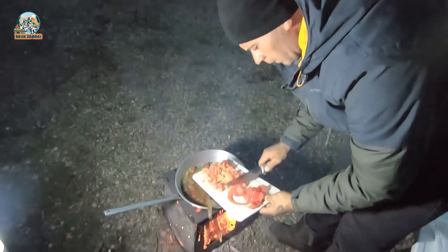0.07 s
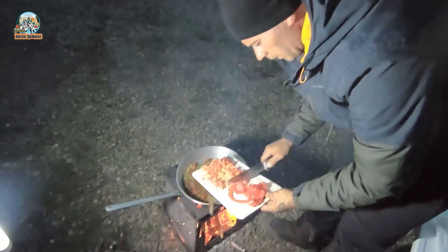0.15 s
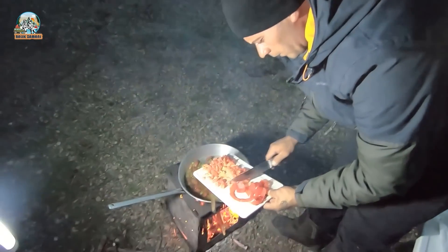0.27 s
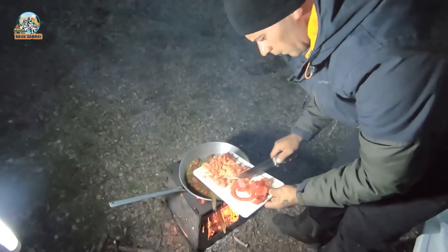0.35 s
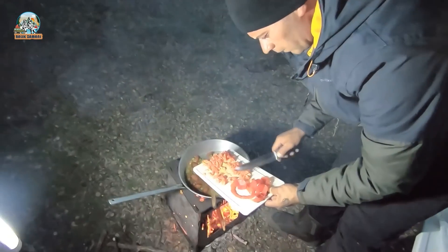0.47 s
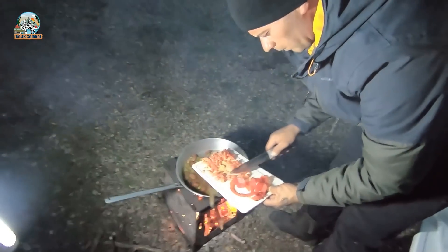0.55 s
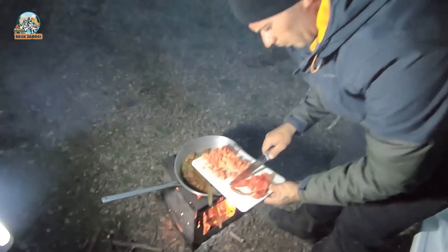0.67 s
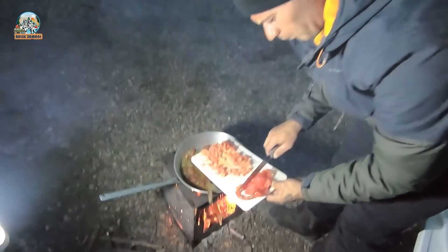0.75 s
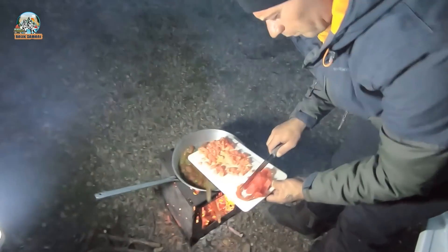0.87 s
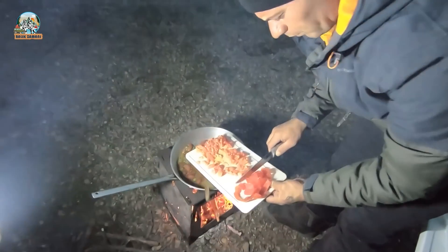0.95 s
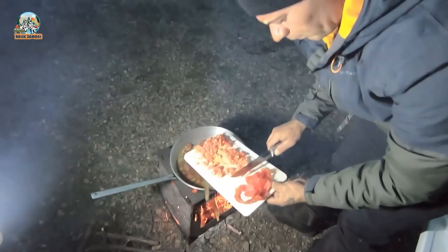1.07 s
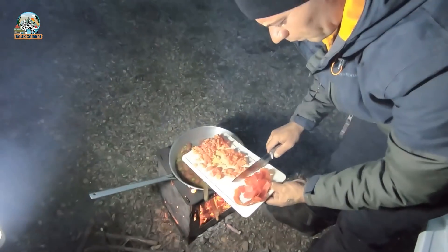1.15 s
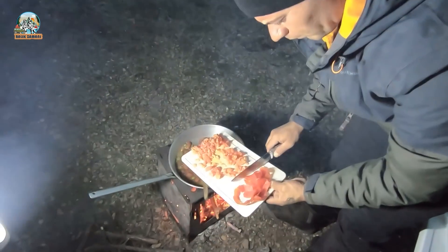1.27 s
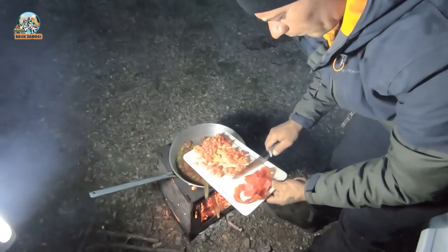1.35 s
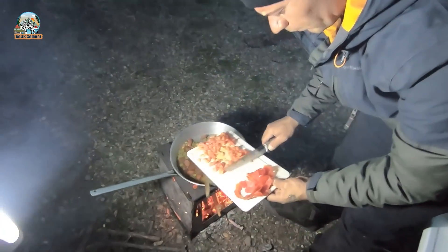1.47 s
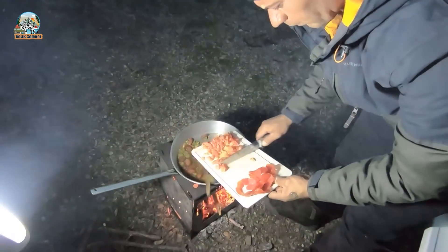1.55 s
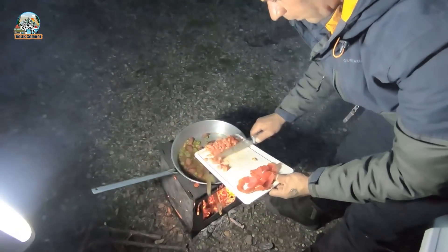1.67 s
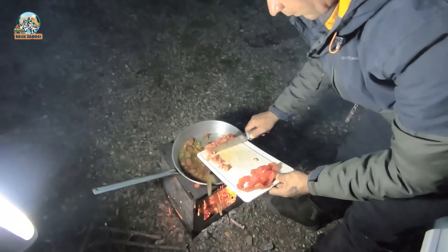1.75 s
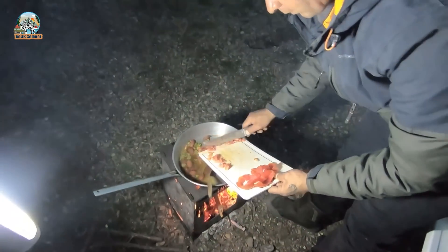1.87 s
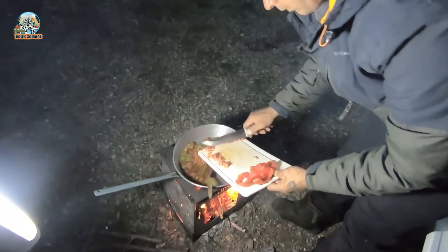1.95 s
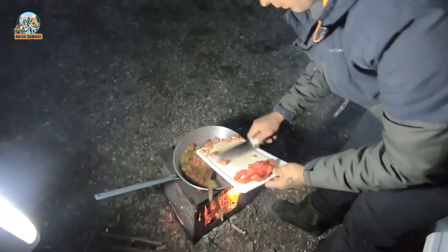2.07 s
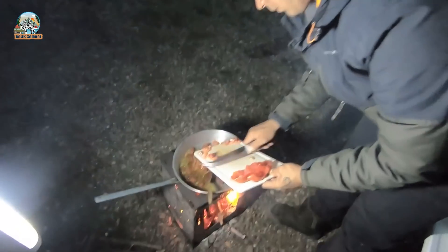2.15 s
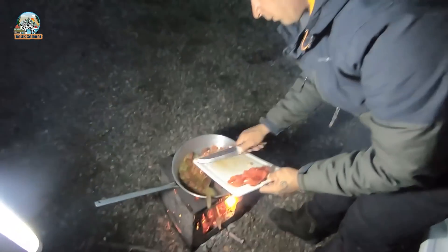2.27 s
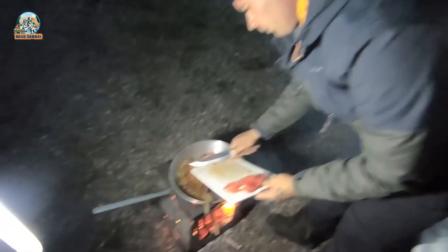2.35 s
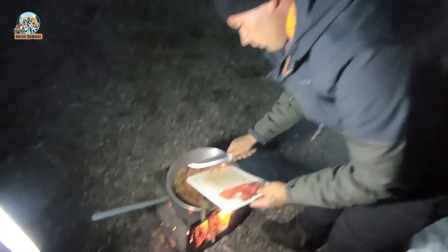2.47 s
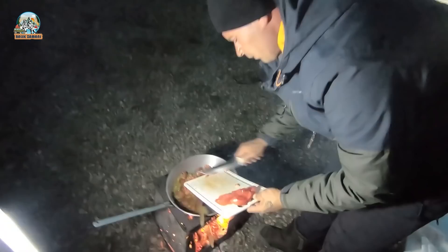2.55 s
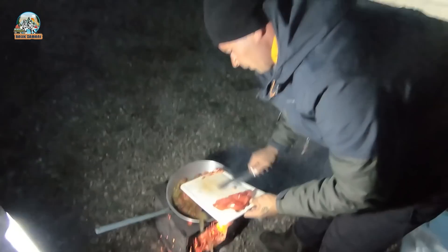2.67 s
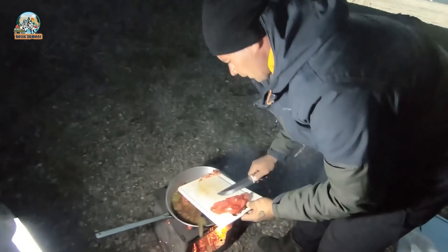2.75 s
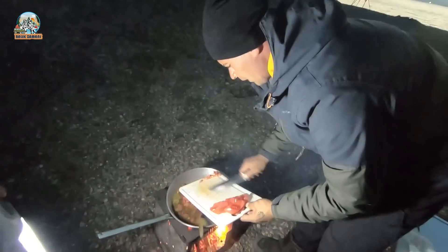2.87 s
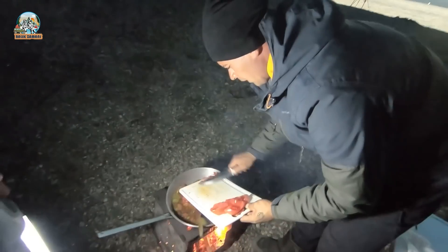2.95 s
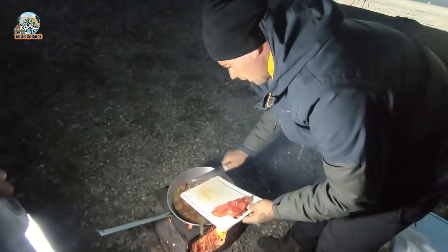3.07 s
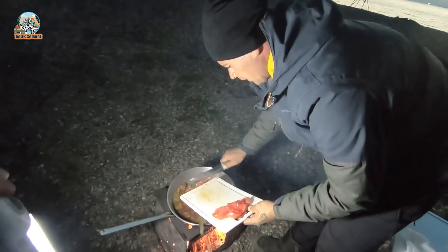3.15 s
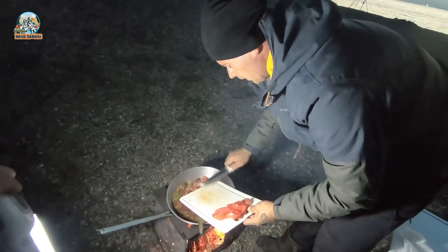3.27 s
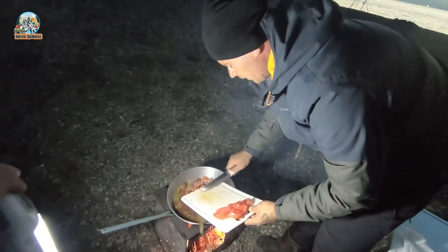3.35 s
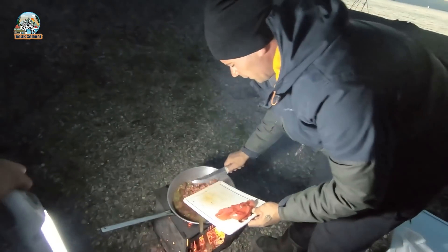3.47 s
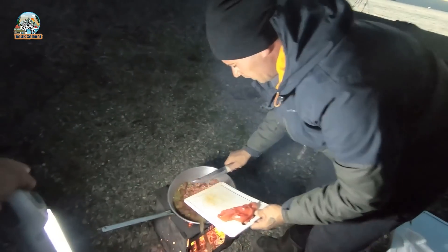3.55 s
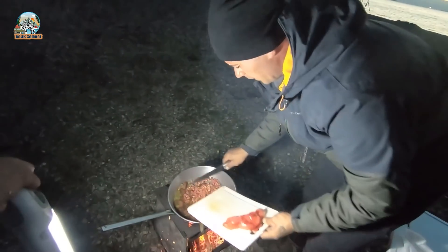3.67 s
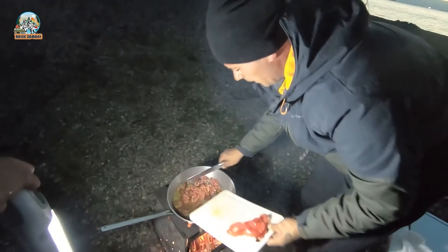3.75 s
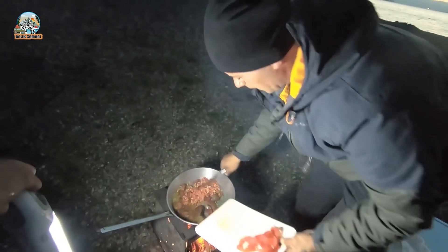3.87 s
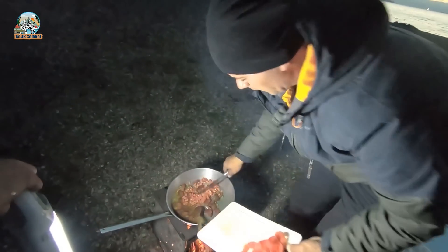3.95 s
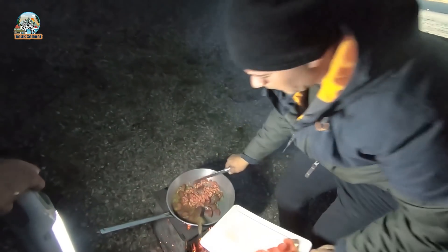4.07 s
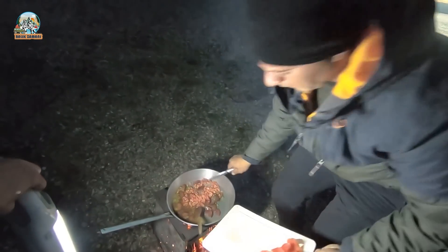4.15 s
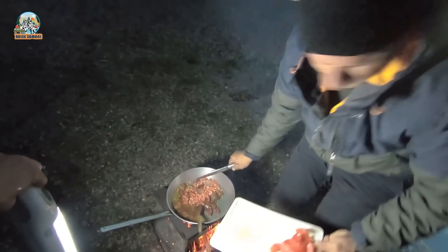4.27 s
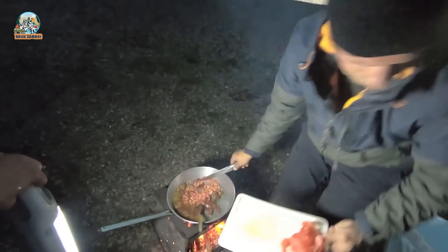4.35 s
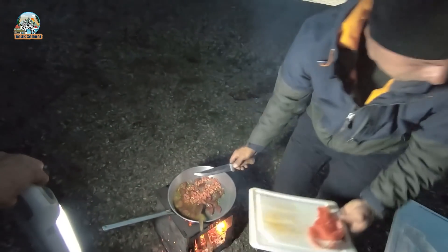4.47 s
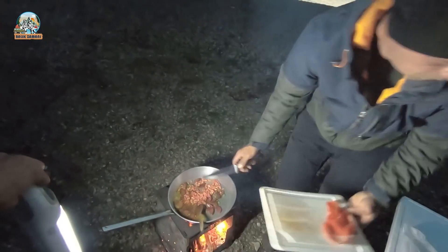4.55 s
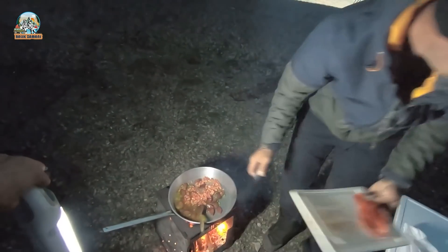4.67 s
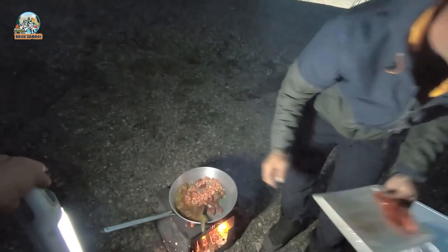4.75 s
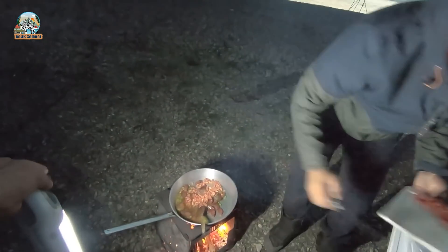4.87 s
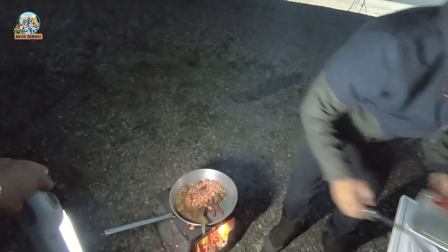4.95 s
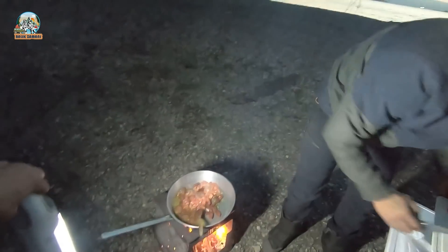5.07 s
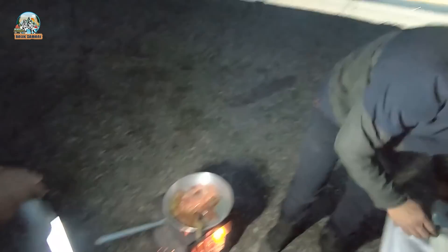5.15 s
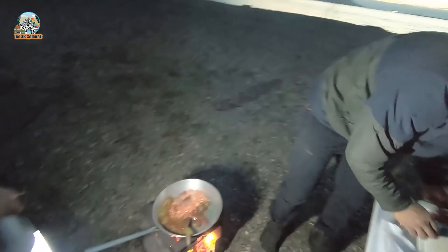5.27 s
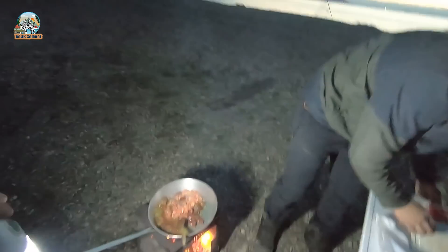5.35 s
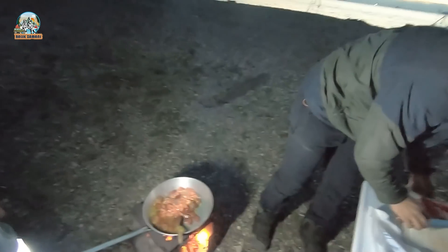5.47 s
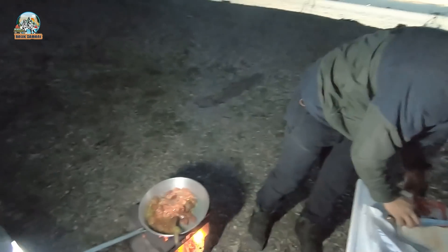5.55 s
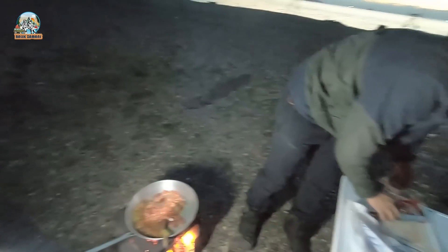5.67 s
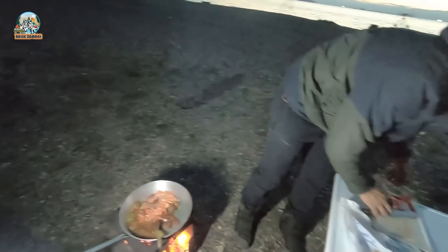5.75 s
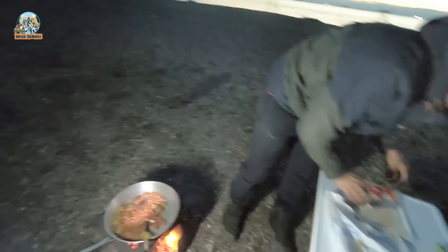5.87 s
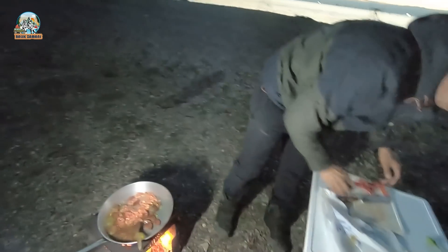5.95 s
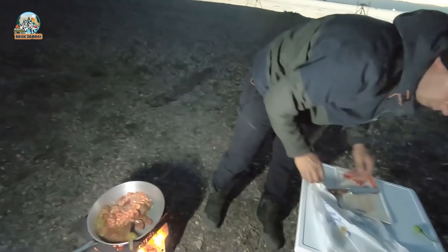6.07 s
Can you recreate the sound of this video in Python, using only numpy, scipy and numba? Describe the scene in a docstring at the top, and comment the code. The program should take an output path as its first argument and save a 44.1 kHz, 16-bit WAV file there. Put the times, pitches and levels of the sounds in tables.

```python
"""Outdoors beside a camp stove, a hand-held two-port microphone a metre and a half from the pan.
Meat fries: oil pops, bubble tones and hiss swell and brighten, with short snaps, plinks and bright ticks.
A knife scrapes chopped meat off a plastic board by stick and slip, ringing both, and taps it clean.
The cook steps aside in short thuds and puts the board on a plastic box to the right in ringing clatter.
Behind, filtered noise makes the fluttering fire and the air brushing the microphone."""
import sys
import numpy as np
from scipy import signal
from scipy.fft import rfft, irfft
from scipy.io import wavfile
from numba import njit

SR = 44100
rng = np.random.default_rng(int(sys.argv[2]) if len(sys.argv) > 2 else 0)


def transcribe(u):
    """Save the signal u as a 16-bit wav file named by the first command-line argument.

    u: samples, shape (n,) or (channels, n), limited to [-1, 1]; the rate is SR.
    q: integer samples, one column per channel.
    """
    v = np.clip(np.atleast_2d(u).T, -1, 1)
    q = np.round(v * 32767).astype(np.int16)
    wavfile.write(sys.argv[1], SR, q)


N = 269451
T = np.arange(N) / SR
HZ = np.maximum(np.arange(4097) * SR / 8192, 1)  # frequency grid for spectra

# bursting oil bubbles: (frequency [Hz], level [dB])
OIL_SPECTRUM = [(180, -51), (300, -11.5), (510, -12), (610, -6), (794, -7), (1330, -5), (2170, -7.5),
                (4280, -0.5), (5390, -5), (7370, -2), (8280, -15), (9600, -8.5), (12500, -19), (15500, -36)]
# bands the open pan favours or shades: (centre [Hz], width [Hz], level [dB])
PAN_BANDS = [(3520, 2800, 2), (7080, 1100, -2), (7600, 730, -1), (10210, 280, 4.5), (11020, 2200, -6)]
# moist meat changes the sizzle: (time [s], level [dB], extra fizz [dB], settling time constant [s])
FLARES = [(0.38, -1.2, 3.5, 1.5), (1.3, 3, -1, 0.41), (1.93, 3, 4.5, 3.66), (2.07, 0.25, 7.5, 0.45),
          (3.13, -1.1, 7, 0.2), (3.6, 0.1, 8.5, 0.31), (4.18, 0, 5.5, 0.076), (4.72, 1.4, 3.5, 0.42),
          (5.331, 1, 2.5, 0.45)]
# short snaps: spits of fat, and at 5.719 s a rattle of the board on the box:
# (time [s], level [dB], pitch [Hz])
SNAPS = [(0.7518, -7.5, 4750), (1.0944, -9.5, 5900), (1.4185, -10.5, 3590), (1.6495, -12.5, 6500),
         (4.461, -12.5, 3240), (5.719, -7, 4030)]
# knife strokes over the board: (start [s], end [s], rasp [dB], swell over the stroke [dB], muffling [dB],
# hollow board [dB], blade ring [dB], blade band [Hz], groan [dB], groan [Hz])
STROKES = [(1.451, 1.696, -45.5, 1.5, -1, -41.5, -42, 2200, -45, 870),
           (1.698, 1.801, -35.5, -4.5, -12, -40, -38.5, 3600, -41, 852),
           (1.82, 1.891, -34, 5, -16, -43.5, -53, 3600, -43.5, 753),
           (2.27, 2.488, -42, -5, 0, -47.5, -39, 2520, -48.5, 970),
           (2.885, 3.115, -35, 3, 2, -49, -36, 3370, -47, 1080)]
# edge rasping on plastic: (frequency [Hz], level [dB])
RASP_SPECTRUM = [(60, -47), (200, 9), (600, -13), (1000, 13.5), (1450, 7.5), (2400, 14), (3000, 11.5),
                 (3750, 13), (4600, -10), (7000, -8), (15000, -33)]
# brief singing of the blade, during scrapes and after one tap, at its mode nearest the pitch:
# (time [s], length [s], level [dB], pitch [Hz])
SQUEALS = [(1.455, 0.073, -41, 2235), (1.835, 0.093, -40, 3538), (2.273, 0.048, -43, 6200),
           (2.361, 0.031, -32.5, 6280), (3.44, 0.041, -39.5, 6100)]
# knife taps on the board: (time [s], level [dB], chatter t60 [s], blade ring [dB], board ring [dB],
# hardness [Hz], clink [dB], clink [Hz], clink t60 [s])
TAPS = [(1.8932, -5.5, 0.009, -9, -24, 3300, -16, 773, 0.084),
        (2.253, -9, 0.015, 8.5, 0, 4920, -3.5, 3538, 0.073),
        (2.837, -4, 0.023, -6.5, -0.5, 1490, -9.5, 1480, 0.031),
        (3.4322, -4, 0.034, 3, 1.5, 4100, -3, 1270, 0.046),
        (3.4782, -5.5, 0.051, -8, 0, 5050, 1, 2900, 0.06)]
# one hard contact: (frequency [Hz], level [dB])
KNOCK_SPECTRUM = [(50, -36), (120, -13), (250, -3), (600, -7), (1300, 5.5), (2000, 2.5), (3200, 5.5),
                  (5000, 2.5), (8000, -3.5), (15000, -5)]
# steel blade modes: (pitch [Hz])
BLADE_HZ = [1035, 2165, 2235, 2550, 2905, 3538, 3915, 4830, 6130, 7456]
# how each blade mode rings: (level [dB], t60 [s])
BLADE_RING = [(7, 0.33), (18.3, 0.19), (21.9, 0.057), (22, 0.063), (7.56, 0.31), (8.3333, 0.29),
              (2.7778, 0.11), (10, 0.16), (6, 0.19), (5, 0.3)]
BLADE_MODES = np.column_stack([BLADE_HZ, BLADE_RING])
# how strongly scraping drives each blade mode: (level [dB])
BLADE_RUB_DB = [-12, -1, -7, -7, -1, 6, -2, 0, -5, -0.5]
# plastic board modes: (pitch [Hz], level [dB], t60 [s])
BOARD_MODES = [(184, 1.5, 0.095), (251, 8.5, 0.035), (270.7, 2, 0.11), (467, 7, 0.027), (616, 3.5, 0.049),
               (698, 3, 0.048), (910, 8, 0.031), (990, 10.5, 0.013)]
# hard plastic and steel set down to the right: (time [s], level [dB], clatter t60 [s], hardness [Hz],
# board ring [dB], left minus right [dB], thud [dB], thud [Hz], clink [dB], clink [Hz], clink t60 [s])
CLACKS = [(4.5643, -2.5, 0.033, 2350, -9, -22.5, -10, 220, -5.5, 7250, 0.0067),
          (5.6784, -1.5, 0.068, 4350, -3.5, -16.5, -14, 175, -4, 2220, 0.047),
          (5.686, 0, 0.22, 1780, -17, -10, -6, 214, -4.5, 1473, 0.046),
          (5.7331, -8, 0.025, 1600, 4, -14, -2.5, 272.6, -12, 641, 0.26),
          (5.7469, -5.5, 0.041, 4600, -29, -14, -9, 535, -14, 1830, 0.13)]
# clatter of the box lid: (frequency [Hz], level [dB])
LID_SPECTRUM = [(50, -36), (130, -44), (300, -16), (800, 0.5), (1450, 2), (2400, 1.5), (4200, 2),
                (5600, -3), (7500, 2.5), (10000, -4), (12000, -32), (15000, -36)]
# plastic box modes: (pitch [Hz], level [dB], t60 [s])
BOX_MODES = [(915, -4, 0.029), (1180, 7, 0.04), (1460, 6, 0.035), (1880, 14, 0.043), (2640, 20.5, 0.02)]
# soft low thuds of meat, board, box and footfalls: (time [s], level [dB], t60 [s], body pitch [Hz])
SOFT_THUDS = [(0.238, -37, 0.099, 260), (1.271, -41.5, 0.05, 476), (2.001, -47.5, 0.39, 343),
              (3.829, -33.5, 0.013, 514), (4.356, -27.5, 0.021, 1260), (5.075, -35, 0.046, 387),
              (5.62, -42, 0.27, 130), (5.776, -28.5, 0.099, 238)]
# boots on packed ground: (time [s], heel [dB], heel [Hz], sole [dB], sole [Hz])
STEPS = [(4.658, -39, 390, -55, 403), (4.825, -37, 345, -37.5, 283), (4.954, -32.5, 1390, -44, 215),
         (5.54, -45, 291, -41, 138)]
# flutter of the fire: (frequency [Hz], level [dB])
FIRE_SPECTRUM = [(40, -23), (65, -4), (90, -39), (120, -13), (160, 4.5), (290, -1), (450, -9.5),
                 (900, -13.5), (3000, -67)]
# puffs of air on the microphone: (time [s], length [s], level [dB], left minus right [dB])
GUSTS = [(4.259, 0.02, -51, -4), (5.252, 0.14, -52, -1.5), (5.528, 0.25, -49, 1),
         (5.897, 0.25, -57.5, -13.5)]
# rumble of air on the microphone: (frequency [Hz], level [dB])
BUFFET_SPECTRUM = [(20, -16), (60, 9.5), (130, 5.5), (250, 2), (600, -15), (2000, -59)]
# share of the sound that differs between the two microphone ports: (frequency [Hz], level [dB])
PORT_DIFFERENCE = [(100, -35), (380, -13), (800, -12), (1300, -8.5), (2400, -9.5), (3800, -23), (5500, -6),
                   (7000, -6), (8700, 3.5), (11000, -11.5), (15000, 1)]

FRY_DB, FIZZ_DB = -41, -8  # the settled sizzle, and the gain of its fine fizz
FLARE_RISE_S = 0.26
# until the board is drawn back from over the pan, the fizz is stronger
BOARD_AWAY_S, BOARD_MOVE_S, COVERED_FIZZ_DB = 2.04, 0.29, 3.5
ROLL_S = 0.034  # from heel to sole
CALM_DB, GUST_RISE_S, GUST_FALL_S = -77, 0.016, 0.045  # air between puffs; how a puff comes and goes
TOP_HZ = 15700  # upper limit of the recorder


def sizzle(pops_per_s=3600, spread_db=1.5, steam_db=-6, bubble_db=-5, flutter_db=1.4,
           flicker_db=-0.5, gap_hz=4000, gap_q=9, gap_db=-7, simmer_db=0, simmer_share=0.29,
           simmer_hz=2000, fizz_hz=6500):
    """Water bursts out of oil in pops and bubble tones; moist meat shifts level, simmer and fizz."""
    flare_db, fizz_db = sum(
        np.outer([db, extra_db], swell(s, FLARE_RISE_S, FLARE_RISE_S, settle_s))
        for s, db, extra_db, settle_s in FLARES)
    covered = np.clip((BOARD_AWAY_S - T) / BOARD_MOVE_S + .5, 0, 1)
    pan_bands_db = sum(db / (1 + (2 * (HZ - hz) / width) ** 2) for hz, width, db in PAN_BANDS)
    tone_db = shape(OIL_SPECTRUM) + pan_bands_db
    rate = pops_per_s * undb(flare_db)
    mid = unit(crackle(rate, spread_db, steam_db) + undb(bubble_db) * bubbles())
    side = colour(crackle(rate, spread_db, steam_db), shape(PORT_DIFFERENCE))
    sound = colour(mid + side * np.array([[1], [-1]]), tone_db)
    # the band around 5 kHz sets the reference level
    sound /= np.std(band(sound.mean(0), [3600, 7500], "bandpass"))
    simmer, rest = split(sound, simmer_hz)
    body, fizz = split(rest, fizz_hz)
    # the gap between board and pan resonates
    body = body + covered * undb(gap_db) * resonance(body, gap_hz, gap_q)
    # each band flickers on its own, half as deeply while the board covers the pan
    unrest = 1 - covered / 2
    wet_db = FIZZ_DB + fizz_db + COVERED_FIZZ_DB * covered
    simmer_gain_db = simmer_db + simmer_share * wet_db + unrest * flicker_db * walk(35)
    simmer = simmer * undb(simmer_gain_db) * pan(-2.0)
    body = body * undb(unrest * flicker_db * walk(30) / 2) * pan(-0.61)
    fizz = fizz * undb(wet_db + unrest * flicker_db * walk(24.9)) * pan(-2.1)
    level_db = FRY_DB + flare_db + unrest * flutter_db * walk(21.92)
    return (simmer + body + fizz) * undb(level_db)


def plinks(level_db=-53):
    """Many bubbles ring longer than the rest, as tiny notes in the sizzle."""
    return undb(level_db) * bubbles(low_hz=2308, high_hz=6960, cycles=24, count=220)


def spatter(per_s=70, spread_db=2.3, level_db=-65, low_hz=5000, top_hz=8000):
    """Tiny droplets burst as faint, bright ticks to the left."""
    ticks = clicks(per_s, spread_db)
    ticks = band(band(ticks, low_hz, "highpass"), top_hz, "lowpass")
    return ports(unit(ticks) * undb(level_db), pan_db=12, width_db=2)


def snaps(t60=0.016, q=5.6, top_hz=7000):
    """Spits of fat and one rattle of the board: short noise bursts, each through one resonance."""
    out = np.zeros(N)
    for s, db, hz in SNAPS:
        snap = band(resonance(chatter(t60), hz, q), top_hz, "lowpass")
        add(out, s, undb(db) * snap / np.linalg.norm(snap))
    return ports(out, pan_db=2.5, width_db=-3)


def scrapes(slips_per_s=1500, spread_db=1.5, grip_db=1.4, edge_s=0.036, bite_q=4, blade_bite_db=7,
            mode_width_hz=36, shift_db=2, groan_q=9, muffle_hz=1550, muffle_width_hz=900,
            groan_waver=0.055, lift_share=0.37):
    """The edge sticks and slips across the board, rasping and ringing both board and blade."""
    slips = clicks(slips_per_s, spread_db) * undb(grip_db * walk(130))
    hollow = unit(ring(slips, BOARD_MODES))
    # pressing broadens the blade modes; each comes and goes as the contact travels along the edge
    blade = sum(undb(db + shift_db * walk(35)) * unit(resonance(slips, hz, hz / mode_width_hz))
                for hz, db in zip(BLADE_HZ, BLADE_RUB_DB))
    # meat lying on the board alters its middle range
    muffle = 1 / (1 + (2 * (HZ - muffle_hz) / muffle_width_hz) ** 2)
    out = np.zeros(N)
    for (start, end, db, swell_db, muffle_db, hollow_db,
         blade_db, blade_hz, groan_db, groan_hz) in STROKES:
        progress = np.clip((T - start) / (end - start), 0, 1)
        # the edge bites quickly and lifts off over a share of the stroke
        contact = np.minimum((T - start) / edge_s, (end - T) / (lift_share * (end - start)))
        pressure = np.clip(contact + .5, 0, 1) * undb(swell_db * (progress - .5))
        rasp = unit(colour(slips, shape(RASP_SPECTRUM) + muffle_db * muffle))
        # the angle of the edge favours one band of the blade in each stroke
        steel = unit(blade + undb(blade_bite_db) * resonance(blade, blade_hz, bite_q))
        # the plastic groans, at a pitch that wanders with the spot being pressed
        groan = unit(resonance(slips, groan_hz, groan_q))
        groan = np.interp(T + groan_waver * np.cumsum(walk(20)) / SR, T, groan)
        stroke = undb(db) * rasp + undb(hollow_db) * hollow
        stroke = stroke + undb(blade_db) * steel + undb(groan_db) * groan
        out += pressure * stroke
    return ports(out, pan_db=-2.0, width_db=-4.5)


def squeals():
    """During scrapes and after one tap, a single mode of the blade sings briefly."""
    out = np.zeros(N)
    for s, length_s, db, hz in SQUEALS:
        mode_hz = min(BLADE_HZ, key=lambda mode: abs(mode - hz))
        add(out, s, sing(length_s, db, mode_hz, waver=0.005, rough_db=3.5))
    return ports(out, pan_db=2.0, width_db=-8)


def taps(chatter_db=22, level_db=5):
    """The knife knocks on the board: a sharp contact and brief chatter; blade and board ring."""
    contact, blade, board, clinks = np.zeros((4, N))
    for s, db, t60, blade_db, board_db, hard_hz, clink_db, clink_hz, clink_t60 in TAPS:
        # a longer chatter carries more of the blow
        blow = undb(chatter_db) * np.sqrt(t60) * chatter(t60)
        blow[0] += 1
        add(contact, s, undb(db) * band(blow, hard_hz, "lowpass"))
        add(blade, s, undb([db + blade_db]))
        add(clinks, s, clink(clink_db, clink_hz, clink_t60))
        add(board, s, undb([db + board_db]))
    knock = undb(level_db) * colour(contact, shape(KNOCK_SPECTRUM))
    sound = knock + ring(blade, BLADE_MODES) + ring(board, BOARD_MODES) + clinks
    return ports(sound, pan_db=-2.0, width_db=-5)


def clacks(level_db=6, own_db=0, box_db=-5, thud_t60=0.1):
    """Knife and board are put down to the right; each port hears its own share of the clatter."""
    contact, clinks = np.zeros((2, 2, N))
    board, box, thuds = np.zeros((3, N))
    for (s, db, t60, hard_hz, board_db, pan_db, thud_db, thud_hz,
         clink_db, clink_hz, clink_t60) in CLACKS:
        blow = chatter(t60) + undb(own_db) * np.array([chatter(t60), chatter(t60)])
        blow = band(blow, hard_hz, "lowpass") / np.sqrt(2)
        add(contact, s, undb(db + level_db) * pan(pan_db) * blow)
        add(board, s, undb([db + board_db]))
        add(box, s, undb([db + box_db]))
        add(clinks, s, pan(pan_db) * clink(clink_db, clink_hz, clink_t60))
        add(thuds, s, clink(thud_db, thud_hz, thud_t60))
    clatter = colour(contact, shape(LID_SPECTRUM)) + clinks
    ringing = ring(board, BOARD_MODES) * pan(-2.6) + ring(box, BOX_MODES) * pan(-5)
    return clatter + ringing + ports(thuds, pan_db=0.0, width_db=-3)


def soft_thuds():
    """Soft padded thuds from handling, footsteps and the box, each a band of dying noise."""
    out = np.zeros(N)
    for s, db, t60, hz in SOFT_THUDS:
        add(out, s, thud(db, t60, hz))
    return ports(out, pan_db=0.0, width_db=0)


def steps(heel_t60=0.073, sole_t60=0.29, weight_db=-13, weight_hz=80):
    """Each boot scuffs with the heel, then the sole takes the weight and the ground thumps."""
    out = np.zeros(N)
    for s, heel_db, heel_hz, sole_db, sole_hz in STEPS:
        add(out, s, thud(heel_db, heel_t60, heel_hz))
        sole = thud(sole_db, sole_t60, sole_hz)
        add(out, s + ROLL_S, sole + thud(sole_db + weight_db, sole_t60, weight_hz))
    return ports(out, pan_db=-2.0, width_db=2)


def fire(level_db=-60, flicker_db=2, side_db=-14):
    """Flames flutter softly in the stove; their low sound reaches both ports almost alike."""
    mid, side = unit(colour(rng.standard_normal((2, N)), shape(FIRE_SPECTRUM)))
    flames = mid + undb(side_db) * side * np.array([[1], [-1]])
    return flames * undb(level_db + flicker_db * walk(22))


def air(gust_db=3):
    """Puffs of air rumble on each port separately, mostly more on the right."""
    rumble = unit(colour(rng.standard_normal((2, N)), shape(BUFFET_SPECTRUM)))
    puffs = sum(undb(db) * pan(pan_db) * swell(s, GUST_RISE_S, length, GUST_FALL_S)
                for s, length, db, pan_db in GUSTS)
    return rumble * (undb(CALM_DB) + puffs) * undb(gust_db * walk(30))


def crackle(pops_per_s, spread_db, steam_db):
    """Pops over a smooth hiss of steam."""
    return unit(clicks(pops_per_s, spread_db) + undb(steam_db) * rng.standard_normal(N))


def bubbles(low_hz=1500, high_hz=9000, cycles=4, spread_db=2.5, count=9000):
    """Bubbles ring at the pitch of their size, fading with a time constant of some cycles."""
    out = np.zeros(N)
    t = T[:int(np.log(100) * cycles * SR / low_hz)]
    for when, size, strength in rng.random((count, 3)):
        hz = low_hz * (high_hz / low_hz) ** size
        burst_db = spread_db * min(-np.log(strength), 4.5)
        tone = np.sin(2 * np.pi * hz * t) * np.exp(-t * hz / cycles)
        # the root of the pitch evens out the energy of short and long tones
        add(out, when * N / SR, undb(burst_db) * np.sqrt(hz) * tone)
    return unit(out)


def sing(length_s, db, hz, waver, rough_db, rate=140, fade_s=0.012):
    """A short driven tone whose pitch and strength waver."""
    t = T[:int(length_s * SR)]
    pitch = hz * (1 + waver * walk(rate)[:len(t)])
    tone = np.sin(2 * np.pi * np.cumsum(pitch) / SR) * undb(rough_db * walk(rate)[:len(t)])
    return undb(db) * unit(tone) * np.clip(np.minimum(t, length_s - t) / fade_s, 0, 1)


def chatter(t60):
    """A dying burst of tiny contacts with unit energy."""
    t = T[:SR // 4]
    burst = rng.standard_normal(len(t)) * np.exp(-np.log(1000) * t / t60)
    return burst / np.linalg.norm(burst)


def clink(db, hz, t60):
    """The one note that the spot struck favours, swelling within a cycle; db sets its energy."""
    t = T[:SR // 4]
    note = np.sin(2 * np.pi * hz * t) * (1 - np.exp(-t * hz)) * np.exp(-np.log(1000) * t / t60)
    return undb(db) * note / np.linalg.norm(note)


def thud(db, t60, hz, rise_s=0.0013):
    """A dull, padded knock: a noise burst limited to a band around one body pitch."""
    t = T[:SR // 4]
    envelope = np.minimum(t / rise_s, 1) * np.exp(-np.log(1000) * t / t60)
    x = band(rng.standard_normal(len(t)) * envelope, [hz / 1.75, hz * 1.4], "bandpass")
    return undb(db) * x * np.linalg.norm(envelope) / np.linalg.norm(x)


def ring(x, modes):
    """Drive decaying modes; small bodies radiate no deep bass; the response has unit energy."""
    t = T[:SR // 2]
    response = sum(
        (-1) ** k * undb(db) * np.sin(2 * np.pi * hz * t) * np.exp(-np.log(1000) * t / t60)
        for k, (hz, db, t60) in enumerate(modes))
    response = band(band(response, 132, "highpass"), 115, "highpass")
    return signal.fftconvolve(x, response / np.linalg.norm(response))[:N]


def resonance(x, hz, q):
    """One band-pass resonance with gain 1 at its centre."""
    return signal.lfilter(*signal.iirpeak(hz, q, SR), x)


def clicks(rate, spread_db):
    """Random clicks, rate a second: many small and a few large, scaled to rms 1."""
    size = undb(spread_db * np.minimum(rng.exponential(size=N), 5.5))
    return unit((rng.random(N) < rate / SR) * size * rng.choice([-1, 1], N))


def walk(rate):
    """Random wander in straight lines between normal draws, rate a second."""
    knots = rng.standard_normal(2000)
    return np.interp(T * rate, np.arange(len(knots)), knots)


def swell(s, rise_s, hold_s, fall_s):
    """An envelope that climbs from time s and starts to die away at s + hold_s."""
    return np.clip((T - s) / rise_s, 0, 1) * np.exp(-np.maximum(T - s - hold_s, 0) / fall_s)


def ports(x, pan_db, width_db, scatter_t60=0.016):
    """Two microphone ports: scattering round the housing makes them differ, mostly in the treble."""
    scattered = signal.fftconvolve(x, chatter(scatter_t60))[:N]
    side = colour(scattered, shape(PORT_DIFFERENCE) + width_db)
    return (x + side * np.array([[1], [-1]])) * pan(pan_db)


def pan(db):
    """Left and right gains for a level difference, left minus right."""
    return undb(np.array([[db], [-db]]) / 2)


def add(track, s, x):
    """Mix x into the track at time s."""
    i = int(s * SR)
    track[..., i:i + x.shape[-1]] += x[..., :N - i]


def shape(points):
    """A (frequency [Hz], level [dB]) spectrum on the frequency grid."""
    hz, db = np.transpose(points)
    return np.interp(np.log(HZ), np.log(hz), db)


def colour(x, db):
    """Causal filter with the given dB response, built from the cepstrum."""
    cepstrum = irfft(np.log(undb(db)))
    half = len(cepstrum) // 2
    # folding the cepstrum onto positive times gives minimum phase
    cepstrum[1:half] *= 2
    cepstrum[half + 1:] = 0
    response = irfft(np.exp(rfft(cepstrum)))
    return signal.oaconvolve(x, np.array(response, ndmin=x.ndim), axes=-1)[..., :N]


def band(x, hz, kind):
    """Butterworth filter of design order 2, kept 1 kHz clear of half the sample rate."""
    edges = np.minimum(hz, SR / 2 - 1000)
    return signal.sosfilt(signal.butter(2, edges, kind, fs=SR, output="sos"), x)


def split(x, hz):
    """Crossover: the parts below and above hz, which add up flat."""
    return [band(band(x, hz, kind), hz, kind) for kind in ("lowpass", "highpass")]


def undb(db):
    """Decibels to gain."""
    return 10 ** (np.asarray(db) / 20)


def unit(x):
    """Scale to rms 1."""
    return x / np.sqrt(np.mean(x ** 2))


@njit
def follow(x, fall):
    """Peak follower: jumps up at once and sinks by a share each sample."""
    out, peak = np.empty(len(x)), 0.
    for i in range(len(x)):
        peak = max(x[i], peak * fall)
        out[i] = peak
    return out


def scene():
    """Everything in the open air, with no walls to echo."""
    frying = sizzle() + plinks() + spatter()
    knife = scrapes() + squeals() + taps()
    handling = snaps() + clacks() + soft_thuds() + steps()
    return frying + knife + handling + fire() + air()


def record(dry, knee_db=-12, release_s=0.05, attack_s=0.00018, slope=0.79):
    """Gain control ducks briefly after peaks above the knee; the recorder cuts the top."""
    peak = follow(np.abs(dry).max(0), np.exp(-1 / (release_s * SR)))
    target = np.maximum(peak / undb(knee_db), 1) ** -slope
    lag = np.exp(-1 / (attack_s * SR))
    gain = 1 + signal.lfilter([1 - lag], [1, -lag], target - 1)
    top_cut = signal.ellip(10, .2, 70, TOP_HZ, fs=SR, output="sos")
    return signal.sosfilt(top_cut, dry * gain)


dry = scene()
out = record(dry)
transcribe(out)
```